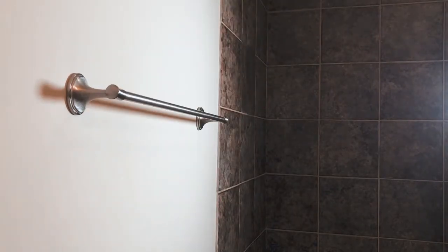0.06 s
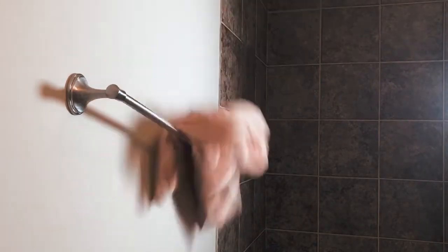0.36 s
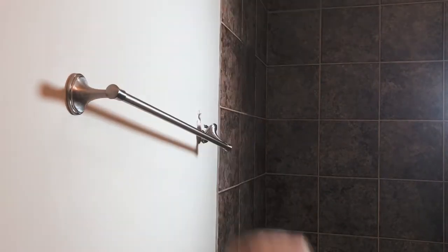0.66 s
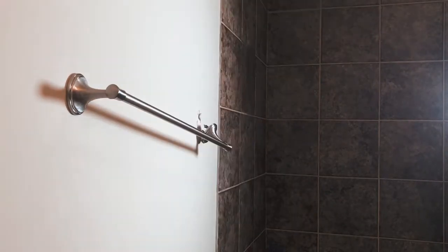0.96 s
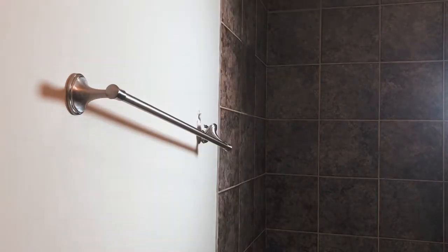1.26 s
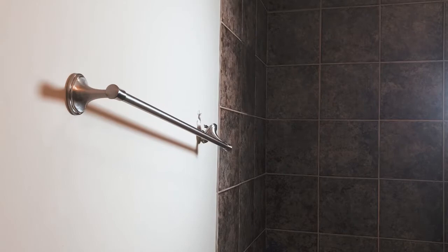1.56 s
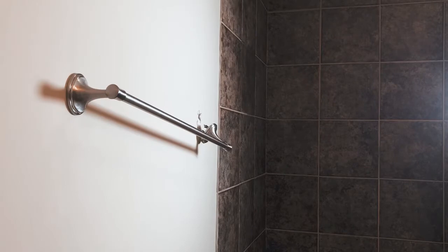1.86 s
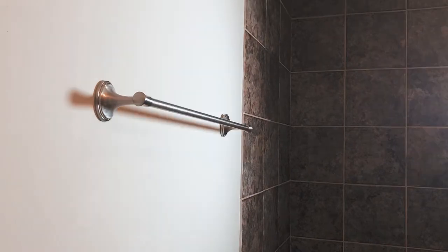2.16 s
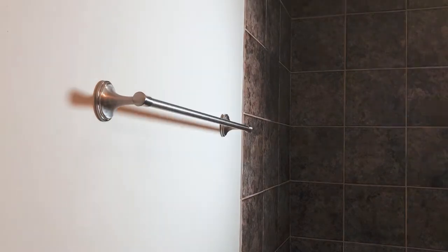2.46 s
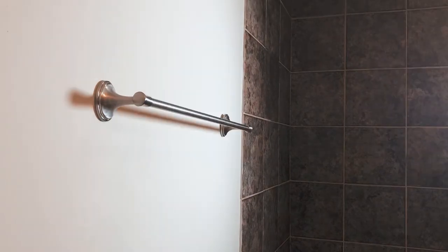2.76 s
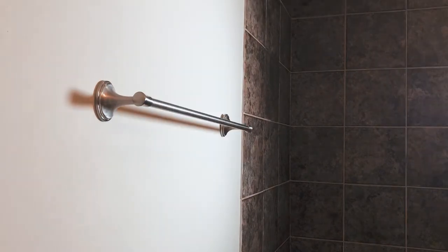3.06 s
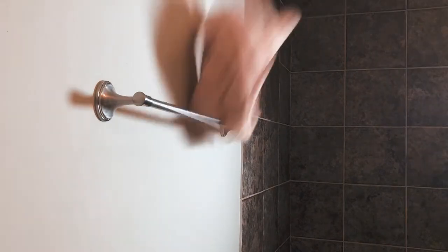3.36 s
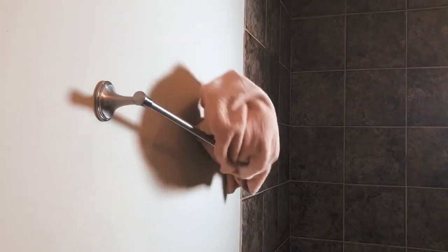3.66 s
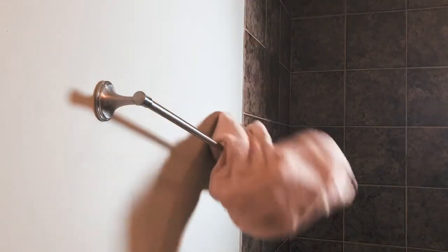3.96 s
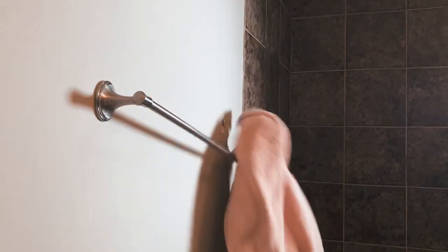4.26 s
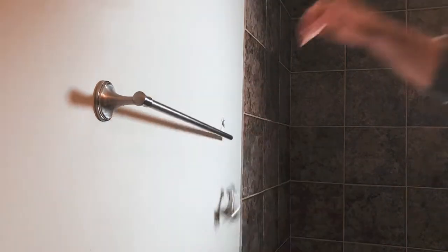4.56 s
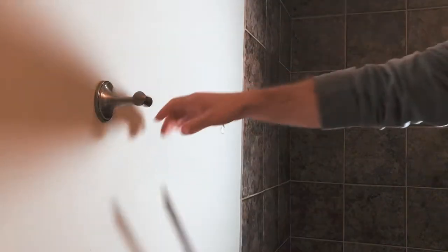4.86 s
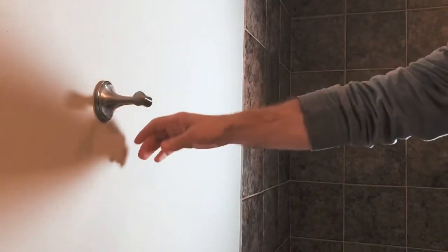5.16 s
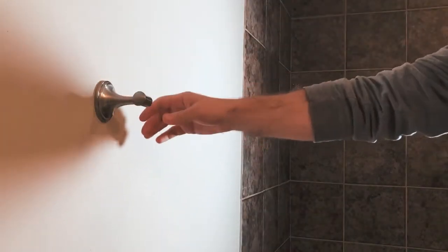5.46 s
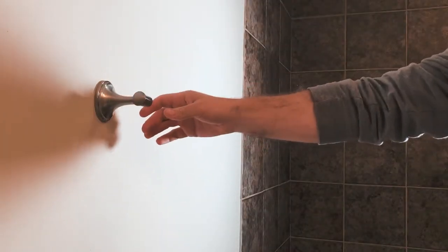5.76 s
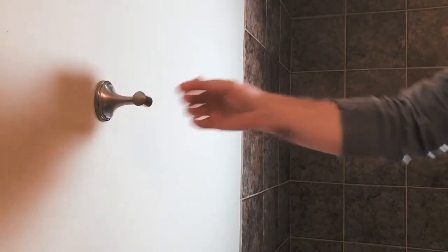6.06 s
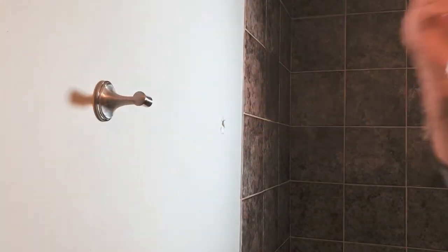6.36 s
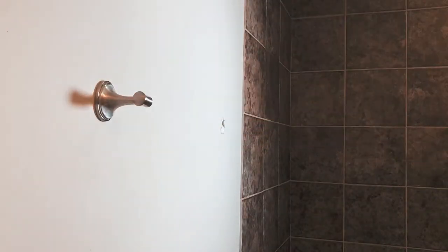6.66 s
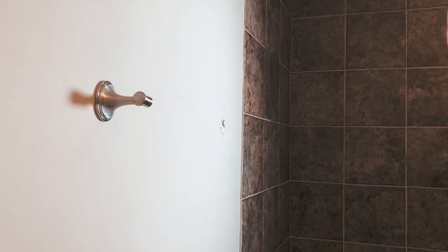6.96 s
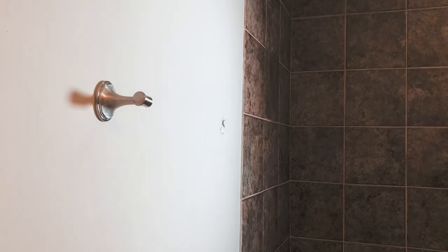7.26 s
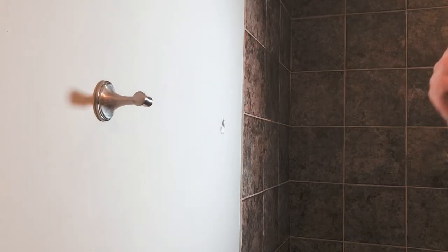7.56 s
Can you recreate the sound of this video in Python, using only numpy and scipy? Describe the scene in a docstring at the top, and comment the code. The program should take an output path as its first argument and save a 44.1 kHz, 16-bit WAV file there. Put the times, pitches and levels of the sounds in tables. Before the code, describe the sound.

From about 0.2 to 0.9 seconds a towel flops onto a loose metal towel bar: cloth slaps and slides, the mount rattles and the hollow wall thumps softly. Only faint room air follows until a second, shorter flop near 3.3 seconds. From 4 seconds the cloth drags harder, and the bracket grates and squeals in short slips. It drops with a sharp, booming bang at 4.5 seconds, followed by a second knock and a few smaller ones. At 5 seconds the metal tube lands on end with a loud, bright clang. It bounces and tumbles over the floor with repeated clanks and sustained ringing tones, then chatters quickly to rest between about 6.2 and 6.7 seconds. A faint low hum swells near 7.4 seconds. One microphone hears everything with the short echo of a tiled bathroom, and the loudest moments are slightly turned down.

```python
"""A towel flops onto a loose metal towel bar, rattling the mount and thumping the hollow wall behind it.
Pulled down, the bracket grates and squeals off its screw and drops with a bang; the tube slides out of
its socket, lands end-on and tumbles over the floor, its modes ringing, until it chatters to rest.
One microphone in a tiled bathroom hears each sound directly and off the tiles, over faint room air
and a low hum; its gain control turns the loudest moments down."""
import sys
import numpy as np
from scipy import signal
from scipy.fft import rfft, irfft, next_fast_len
from scipy.io import wavfile
from scipy.ndimage import uniform_filter1d, map_coordinates

SR = 44100
rng = np.random.default_rng(int(sys.argv[2]) if len(sys.argv) > 2 else 0)


def wav_record(signal):
    """Record a signal, one row per channel, as 16-bit PCM in the file named by sys.argv[1]."""
    frames = np.transpose(np.atleast_2d(signal))
    bounded = np.clip(frames, -1, 1)
    # unit amplitude maps onto the largest positive 16-bit level
    quanta = np.round(bounded * 32767).astype(np.int16)
    wavfile.write(sys.argv[1], SR, quanta)


N = 335601
TIME = np.arange(N) / SR
STEPS = TIME[::64]   # coarse clock for slow changes
CONTACT_S = 0.0025   # how long a blow of neutral hardness touches the tube
RATTLE_RISE_S, RATTLE_T60_S = 0.0084, .14

# spectra of the wall's thud, rubbing cloth and the loose mount's rattle: f/Hz, level/dB
THUD_SPECTRUM = [(40, -50), (75, -32.5), (110, -4), (160, 0), (195, 1.5), (240, -3.5), (320, -10),
                 (600, -14.5), (1200, -26), (3000, -51.5)]
CLOTH_SPECTRUM = [(150, -15), (500, -11), (1100, -3.5), (2000, -2), (3200, -7), (5000, -10.5), (8000, -17),
                  (10500, -21), (13000, -20.5), (16000, -22)]
RATTLE_SPECTRUM = [(900, -20.5), (2300, -1.5), (3100, 7), (3700, -6.5), (4400, 1.5), (5100, -14),
                   (5800, -4), (6600, -24.5), (7300, -11), (10500, -37.5), (12400, -14.5), (16000, -30.5)]
# slips of the bracket on its screw: t/s, grit level/dB
SCREW_SLIPS = [(4.26, -27.5), (4.355, -28.5), (4.415, -29.5), (4.66, -28)]
# reverberation of the bathroom: f/Hz, t60/s
BATHROOM_T60 = [(100, 0.44), (300, 0.28), (1000, 0.27), (4000, 0.33), (14000, 0.077)]


def tube(flutter_per_cycle=.011):
    """Each blow rings the metal tube in its bending, lengthwise and wall modes, and clacks."""
    # the three families of modes: f/Hz, relative level/dB, t60/s
    bending_modes = [(258, -41, 2.5), (705, -28, 3.5), (1363, 0, 5), (2224, -2, 3.3), (3263, 0, 2.3),
                     (4457, 4, 1.1), (5798, -1, .75), (7272, -3, .65), (8836, -5, .5), (10490, -13, .55)]
    lengthwise_modes = [(4161, -1, 3), (8323, -2, 3), (12482, -10, 2.5)]
    tube_wall_modes = [(11950, -2.5, 0.4), (12030, -2.5, .35), (11790, -1.5, 0.23), (13600, 3.5, 0.24),
                       (12680, 1.5, .3), (14010, -7, .3), (13500, -1, 0.24), (14300, -5.5, 0.44),
                       (15000, -0.5, .3), (15500, -2, 0.27), (14500, -5.5, .25)]
    # spectrum of a contact's clack: f/Hz, level/dB
    clack_spectrum = [(400, -31.5), (1000, -18.5), (2200, 0), (3500, -3.5), (4500, 5.5), (5800, -0.5),
                      (7200, -2), (8000, -9.5), (8900, -8.5), (9800, -18), (11200, -25), (12100, -9.5),
                      (15000, -8), (16000, -19)]
    t, blow_db, tilt_db, place, sizzle_db, kept = contacts()
    contact_s = CONTACT_S * .5 ** (tilt_db / 7)   # harder contacts are shorter
    upright = (t > 4.96) & (t < 5.5)   # on end, the tube rings more along its length
    lengthwise_db = blow_db + np.where(upright, -11.0, -29.5)
    age = np.maximum(STEPS - t[:, None], 0)
    fed = np.clip(age / contact_s[:, None], 0, 1)   # energy enters while the contact lasts
    choke = 2 * np.log(np.clip(kept, .01, 1))[:, None] * fed
    later_chokes = np.cumsum(choke[::-1], axis=0)[::-1] - choke   # later contacts damp what still rings
    alive = fed * np.exp(later_chokes)

    def power(kicks_db, t60):
        """Decaying energy of one mode, summed over all contacts."""
        return from_db(kicks_db) ** 2 @ (alive * np.exp(-2 * np.log(1000) * age / t60))

    ring = 0
    for order, (hz, db, t60) in enumerate(bending_modes, 1):
        octaves = np.log2(max(hz, 1600) / 3500)   # the tilt pivots at 3500 Hz, flat below 1600 Hz
        feed_db = blow_db + tilt_db * octaves + mode_shape_db(order, place)
        ring += tube_mode(hz, power(db + feed_db, t60), flutter_per_cycle * hz, wet_db=3.5)
    for hz, db, t60 in lengthwise_modes:
        ring += tube_mode(hz, power(db + lengthwise_db, t60), flutter_per_cycle * hz, wet_db=6.5)
    for hz, db, t60 in tube_wall_modes:   # close together, they blur into a shimmer
        ring += tube_mode(hz, power(db + sizzle_db, t60), flutter_per_s=170.0, wet_db=4.0)
    clack_db = 9 + 1.25 * (blow_db + tilt_db)
    clack = swells(t + contact_s, contact_s, 0.0097, clack_db) * noise(clack_spectrum)
    return ring + bathroom(clack, wet_db=-6.5)


def tube_mode(hz, power, flutter_per_s, wet_db):
    """One mode reaches the microphone directly and off the tiles; the tumbling makes the two beat."""
    lag = 1e-6 ** (STEPS[1] / at_hz(BATHROOM_T60, hz))
    lingering = signal.lfilter([1 - lag], [1, -lag], power + 1e-18)
    slow = wander(flutter_per_s) + 1j * wander(flutter_per_s)
    quick_per_s = min(4 * flutter_per_s, 300)
    quick = wander(quick_per_s) + 1j * wander(quick_per_s)   # the fast-swinging ends shift pitch most
    reflections = (slow + from_db(-14.0) * quick) * np.sqrt(lingering / 2)
    wet = from_db(wet_db + 2.5 * np.log2(hz / 3500))   # short waves are scattered more
    swing = np.interp(TIME, STEPS, (np.sqrt(power) + wet * reflections) / np.hypot(1, wet))
    phase = 2 * np.pi * hz * TIME
    return np.sqrt(2) * (swing.real * np.sin(phase) + swing.imag * np.cos(phase))


def mode_shape_db(order, place, node_leak=0.031):
    """How well a blow at this place on a free tube feeds a bending mode; a little enters even at a node."""
    return 10 * np.log10(node_leak + np.cos(np.pi * ((order + .5) * place + .25)) ** 2)


def contacts():
    """All blows on the tube in order of time: jogs in the socket, bounces, the last rattle."""
    # blows as the tube leaves the socket and tumbles: t/s, strength/dB, hardness as tilt/(dB per octave),
    # place along the tube/0-1, sizzle of the tube wall/dB, ringing that survives/0-1
    bounces = [(4.643, -32, -2.7, .376, -42.5, .1), (4.905, -52, 9.5, 0.43, -52.5, 0.9),
               (5.001, -37, 1.5, .37, -52, 1), (5.023, -17.5, -1.9, .369, -34.5, .3),
               (5.228, -35, 2, .39, -47.5, 0.94), (5.354, -33, -9.5, .404, -57, 0.96),
               (5.447, -31.5, -8, .183, -49, 1), (5.565, -21, 2.5, .391, -32.5, 1),
               (5.697, -20.5, 2, .351, -34, 0), (5.738, -20.5, -1.2, .317, -33.5, 0.3),
               (5.973, -22, -2, .086, -31, .8), (6.082, -25.5, 5.5, .125, -36.5, 0.33),
               (6.214, -25.5, 5, .244, -32.5, 0.25), (6.28, -25.5, 2, 0.29, -38.5, 0.3),
               (6.32, -32, 5, .102, -39, 0.38), (6.427, -29.5, 6.5, 0.24, -54, 0.2),
               (6.445, -31, 5.5, 0.23, -42, 0.3)]
    jogs = [(t, db - 19.5, 0, 0.41, db - 20, .3) for t, db in SCREW_SLIPS if t < bounces[0][0]]
    return np.transpose(sorted(jogs + bounces + settling()))


def settling(count=9, start_s=6.365, first_gap_s=0.039, gap_ratio=0.96, tilt_db=4, kept=0.1973):
    """The tube rattles to rest: the gaps shrink, and the touches hold their strength, then fade fast."""
    touch = np.arange(count)
    gaps = first_gap_s * gap_ratio ** touch
    times = start_s + np.cumsum(gaps) - gaps
    levels_db = -35 - 46 * (touch / touch[-1]) ** 2
    places = rng.random(count) / 2
    return [(t, db, tilt_db, place, db - 8.5, kept) for t, db, place in zip(times, levels_db, places)]


def chatter(down_from_s=6.15, t60_s=0.28):
    """Once down, the tube touches the tiles quickly and unevenly after each blow."""
    # spectrum of metal chattering on tile: f/Hz, level/dB
    chatter_spectrum = [(800, -26.5), (2400, -4.5), (3500, -3.5), (4500, 11), (6000, -2.5), (7200, -4),
                        (10000, -24), (12500, -15.5), (16000, -13)]
    t, blow_db = contacts()[:2]
    down = t > down_from_s
    touches = noise(chatter_spectrum, grains(per_s=320, spread_db=1.5))
    envelope = swells(t[down] + CONTACT_S, CONTACT_S, t60_s, blow_db[down] - 1)
    return bathroom(envelope * touches, wet_db=-0.5)


def bracket(crack_t60_s=.025, boom_t60_s=.3):
    """The bracket falls: each knock is a sharp crack and a hollow boom from the wall."""
    # hard knocks of bracket and fittings: t/s, rise/s, boom level/dB, crack level/dB
    knocks = [(3.727, 0.0022, -66, -68), (4.4899, 0.00068, -12, -5.5), (4.56, 0.0022, -15, -16),
              (4.667, 0.0036, -30, -45.5), (4.87, 0.0031, -41.5, -59.5), (4.925, 0.019, -28.5, -24.5),
              (5.0, 0.0037, -50, -26.5), (7.424, .001, -88, -58)]
    # spectra of the crack and the boom: f/Hz, level/dB
    crack_spectrum = [(200, -11), (700, 1.5), (1500, 2.5), (3500, -6.5), (6000, -19), (10000, -27),
                      (16000, -32.5)]
    boom_spectrum = [(40, -45.5), (80, -32.5), (120, -6), (210, -1), (400, -7), (630, -6.5), (900, -13),
                     (1500, -28), (3000, -23.5), (8000, -45)]
    t, rise, boom_db, crack_db = np.transpose(knocks)
    crack = swells(t, rise, crack_t60_s, crack_db) * noise(crack_spectrum)
    # the heavy panel answers a little later
    boom = swells(t + 0.004, rise + 0.0067, boom_t60_s, boom_db) * noise(boom_spectrum)
    return bathroom(boom, wet_db=-3.5) + bathroom(crack, wet_db=-6.0) + wall_ring(t, boom_db - 8.5)


def pull(start_s=4.027, end_s=4.47, fade_s=.04, growth_db_per_s=53.5):
    """The towel drags ever harder; the bracket grates and squeals in slips that shake the wall."""
    # squeals of the bracket: t/s, t60/s, f/Hz, level/dB, roughness/share of the pitch
    squeals = [(4.249, 0.2, 3225, -23.5, 0.028), (4.305, 0.46, 5808, -32.5, 0.0037),
               (4.359, .21, 7600, -44.5, .006), (4.41, 0.41, 2850, -34.5, 0.0082),
               (4.43, 0.63, 2105, -35.5, 0.0045)]
    # spectrum of the bracket grating on its screw: f/Hz, level/dB
    grit_spectrum = [(410, -41), (700, -17.5), (2330, 1.5), (2660, -7), (3110, 0), (3690, -3),
                     (4990, -10.5), (5690, -4), (6400, -17), (7390, -11.5), (11100, -27.5), (13100, -10.5),
                     (16000, -27.5)]
    held = np.interp(TIME, [start_s - fade_s, start_s, end_s, end_s + fade_s], [0, 1, 1, 0])
    drag = held * from_db(-57 + growth_db_per_s * (np.minimum(TIME, end_s) - start_s))
    t, grit_db = np.transpose(SCREW_SLIPS)
    slips = swells(t, rise_s=0.027, t60_s=0.26, level_db=grit_db)
    shaking = swells(t, RATTLE_RISE_S, RATTLE_T60_S, grit_db - 6)
    scrape = drag * noise(CLOTH_SPECTRUM, grains(per_s=12000, spread_db=3.0))
    scrape += slips * noise(grit_spectrum, grains(per_s=1600, spread_db=4.5))
    scrape += shaking * noise(RATTLE_SPECTRUM, grains(per_s=840, spread_db=6.0))
    for at, t60, hz, db, roughness in squeals:
        squeal = wavering_tone(hz, roughness, per_s=220)
        scrape += swells([at], rise_s=0.015, t60_s=t60, level_db=db) * squeal
    rumble = np.hypot(from_db(-1.5) * drag, from_db(-3.5) * slips) * noise(THUD_SPECTRUM)
    return bathroom(scrape + rumble, wet_db=-6.0)


def towel(t60_s=0.29):
    """Cloth slaps and slides on the bar, the loose mount rattles, and the weight thumps the wall."""
    # flops against bar, wall or floor: t/s, rise/s, relative thud level/dB, relative cloth level/dB
    flops = [(0.165, 0.011, -29, -37.5), (0.208, 0.053, -28, -31), (0.314, 0.057, -26.5, -22.5),
             (0.358, 0.029, -19, -33), (0.404, 0.018, -24.5, -36), (0.471, 0.031, -26, -26.5),
             (0.748, 0.0056, -33.5, -49.5), (0.787, 0.048, -30, -41), (0.84, 0.03, -28.5, -38),
             (3.332, 0.019, -36, -29.5), (3.356, 0.028, -28.5, -24), (3.398, 0.015, -27, -35),
             (3.472, 0.033, -39, -35.5)]
    t, rise, thud_db, cloth_db = np.transpose(flops)
    rubbing = noise(CLOTH_SPECTRUM, grains(per_s=12000, spread_db=3.5))
    cloth = swells(t, rise, t60_s, cloth_db - 3.5) * rubbing
    shaking = swells(t, RATTLE_RISE_S, RATTLE_T60_S, 11.5 + 1.555 * cloth_db)   # hard flops rattle more
    rattle = shaking * noise(RATTLE_SPECTRUM, grains(per_s=3400, spread_db=6.5))
    thud = swells(t, rise, t60_s, thud_db + 1.5) * noise(THUD_SPECTRUM)
    return bathroom(cloth + rattle, wet_db=-5.5) + bathroom(thud, wet_db=-5.5) + wall_ring(t, thud_db - 8)


def wall_ring(times, levels_db, t60_s=.3, lowest_hz=100.0):
    """Each push sets the modes of the hollow wall ringing; the panel radiates no deep bass."""
    # modes of the hollow wall: f/Hz, level/dB
    panel_modes = [(114, -8), (145, -2), (194, -3), (222, -0.5), (299, -4.5), (346, -7)]
    pushes, ring = np.zeros(N) + 1e-18, 0
    pushes[(times * SR).astype(int)] = from_db(levels_db)
    decay = 1e-3 ** (1 / (t60_s * SR))
    for hz, db in panel_modes:
        angle = 2 * np.pi * hz / SR
        feedback = [1, -2 * decay * np.cos(angle), decay ** 2]
        ring += from_db(db) * signal.lfilter([0, np.sin(angle)], feedback, pushes)
    return signal.sosfilt(signal.butter(4, lowest_hz, "high", fs=SR, output="sos"), ring)


def bathroom(x, wet_db):
    """Direct sound plus a dense tail from the tiles, dying band by band; the total power is kept."""
    age, tail = TIME[:SR * 3 // 5], 0
    edges_hz = np.geomspace(60, 17000, 9)
    for low, high in zip(edges_hz, edges_hz[1:]):
        bandpass = signal.butter(2, [low, high], "band", fs=SR, output="sos")
        band = signal.sosfilt(bandpass, rng.standard_normal(len(age)))
        tail += band * 1e-3 ** (age / at_hz(BATHROOM_T60, np.sqrt(low * high)))
    tail *= np.clip(age / 0.0017 - .5, 0, 1)   # near tiles answer within milliseconds
    reflections = signal.fftconvolve(x, tail / np.linalg.norm(tail))[:N]
    wet = from_db(wet_db)
    return (x + wet * reflections) / np.hypot(1, wet)


def background():
    """Room air, faint handling of cloth and a low wavering hum that swells twice."""
    # spectra of room air and rustling cloth: f/Hz, level/dB
    air_spectrum = [(18, -65), (30, -35.5), (103, -4.5), (239, -5.5), (295, -8.5), (374, -14),
                    (1220, -17.5), (1540, -17), (1910, -19.5), (8740, -34.5), (16000, -42)]
    rustle_spectrum = [(180, -37.5), (300, -4.5), (994, -7), (1170, -5.5), (1640, -1.5), (2650, -3.5),
                       (15000, -18), (16000, -21)]
    # level of the steady background noise over time: t/s, level/dB
    air_levels = [(0, -65), (2.2, -69.5), (2.5, -64.5), (3.9, -67), (5.1, -52.5), (6.75, -73), (7.15, -76),
                  (7.35, -68.5)]
    # swells of the rustle and the hum: t/s, rise/s, t60/s, level/dB
    rustle_swells = [(0, .01, 0.6, -58), (2.9, 0.6, 5.3, -66), (3.8, .2, 5, -66), (5.1, .3, 2.8, -47),
                     (6.95, 0.11, 0.43, -70), (7.419, .15, 2.0, -78)]
    hum_swells = [(6.5, 1.6, 4.3, -63), (7.39, 0.23, 1.18, -51)]
    hum = swells(*np.transpose(hum_swells)) * wavering_tone(hz=156, depth=.015, per_s=4.7)
    rubbing = noise(rustle_spectrum, grains(per_s=8600, spread_db=1.5))
    rustle = swells(*np.transpose(rustle_swells)) * rubbing
    air = from_db(np.interp(TIME, *np.transpose(air_levels))) * noise(air_spectrum)
    return air + rustle + hum


def swells(times, rise_s, t60_s, level_db):
    """Envelope of bursts that rise to their moment and die away; their powers add."""
    power = np.zeros(N)
    for t, rise, t60, db in np.broadcast(times, rise_s, t60_s, level_db):
        span = slice(max(int((t - rise) * SR), 0), int((t + 2 * t60) * SR))
        age = TIME[span] - t
        attack = np.clip(1 + age / rise, 0, 1)
        power[span] += (attack * from_db(db - 60 * np.maximum(age, 0) / t60)) ** 2
    return np.sqrt(power)


def noise(spectrum, source=None):
    """Steady noise, or a given train of grains, shaped by a spectrum; rms 1."""
    source = rng.standard_normal(N) if source is None else source
    size = next_fast_len(N)
    hz = np.arange(size // 2 + 1) * SR / size
    shaped = irfft(rfft(source, size) * from_db(at_hz(spectrum, hz)), size)[:N]
    return shaped / np.sqrt(np.mean(shaped ** 2) + 1e-20)


def grains(per_s, spread_db):
    """Tiny slips or touches at random moments, of uneven size."""
    sizes = from_db(spread_db * np.minimum(rng.exponential(1, N), 4))
    return (rng.random(N) < per_s / SR) * sizes * rng.choice([-1, 1], N)


def wavering_tone(hz, depth, per_s):
    """A sine of rms 1 whose pitch strays by about the share depth."""
    pitch_hz = hz * (1 + depth * np.interp(TIME, STEPS, wander(per_s)))
    return np.sqrt(2) * np.sin(2 * np.pi * np.cumsum(pitch_hz) / SR)


def wander(per_s):
    """A smooth random curve on the coarse clock, of spread near 1, changing about per_s times a second."""
    return map_coordinates(rng.standard_normal(4096), [STEPS * per_s], order=3, mode="wrap")


def at_hz(points, hz):
    """Read a table on a log-frequency axis."""
    f, value = np.transpose(points)
    return np.interp(np.log(hz + 1e-9), np.log(f), value)


def from_db(db):
    """Decibels to gain."""
    return 10 ** (np.asarray(db) / 20)


def gain_control(x, limit_db=-19.0, share_removed=0.69, attack_s=0.056, recovery_db_per_s=42.5):
    """The gain falls quickly when the microphone's level passes the limit, and recovers slowly."""
    level_db = 10 * np.log10(np.maximum(uniform_filter1d(x ** 2, size=700), 1e-12))
    recovery = recovery_db_per_s * TIME
    excess_db = np.maximum.accumulate(np.maximum(level_db - limit_db, 0) + recovery, axis=-1) - recovery
    lag = np.exp(-1 / (attack_s * SR))
    return x * from_db(-share_removed * signal.lfilter([1 - lag], [1, -lag], excess_db))


def scene():
    """Everything in the bathroom, at one microphone."""
    return (towel() + pull() + bracket() + tube() + chatter() + background())[None]


def record(dry):
    """Gain control holds down the loud ringing, peaks are rounded, deep bass and the top are cut."""
    rounded = 0.82 * np.tanh(gain_control(dry) / 0.78)
    thin = signal.sosfilt(signal.butter(4, 82, "high", fs=SR, output="sos"), rounded)
    return signal.sosfilt(signal.ellip(10, .1, 80, 15850, fs=SR, output="sos"), thin)


dry = scene()
out = record(dry)
wav_record(out)
```